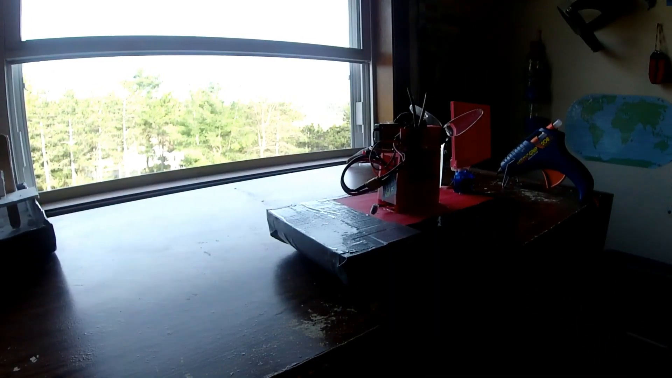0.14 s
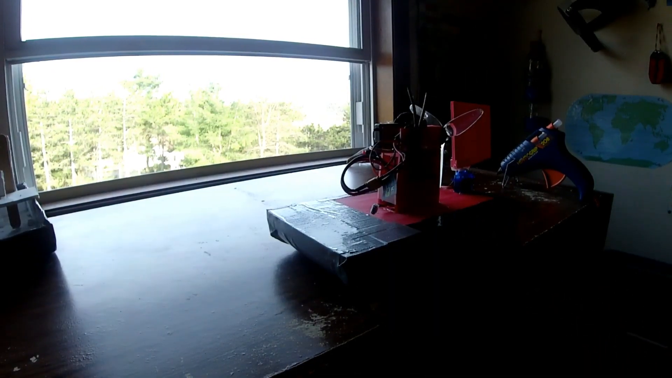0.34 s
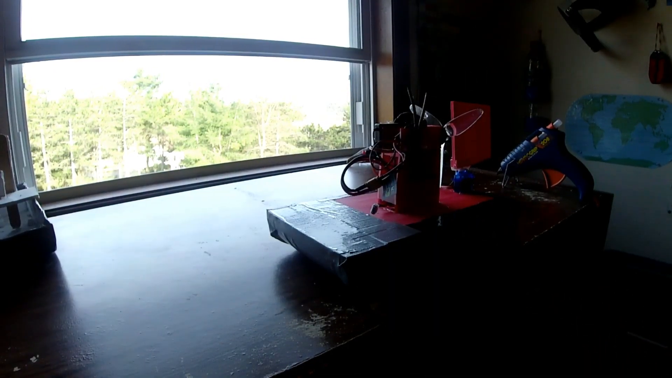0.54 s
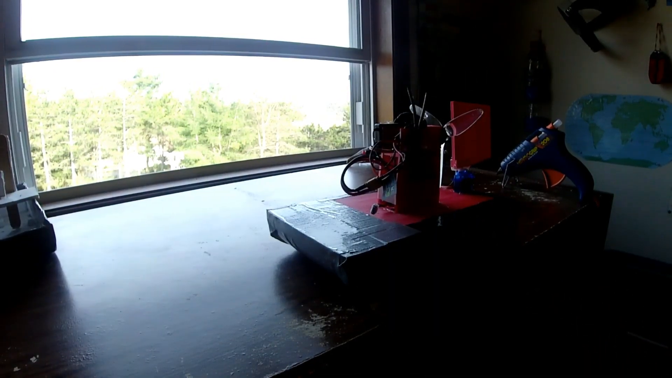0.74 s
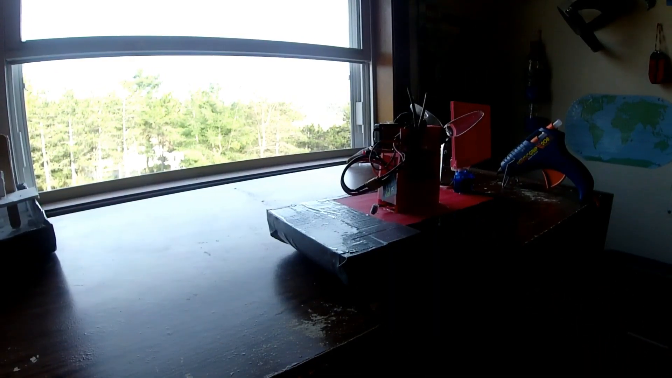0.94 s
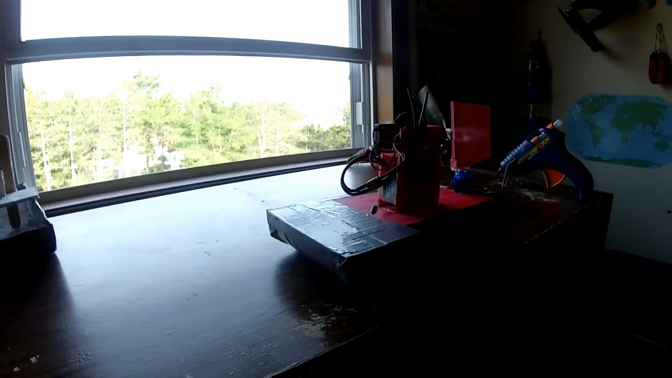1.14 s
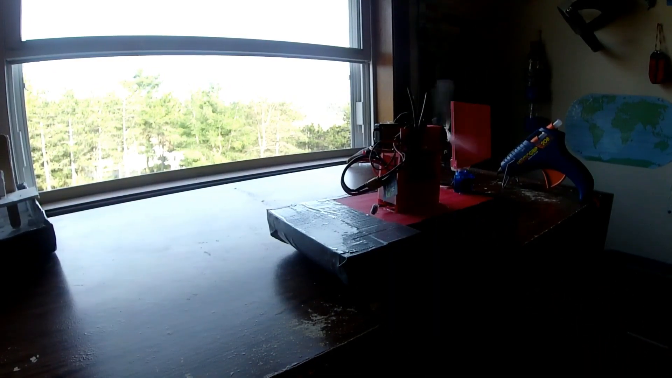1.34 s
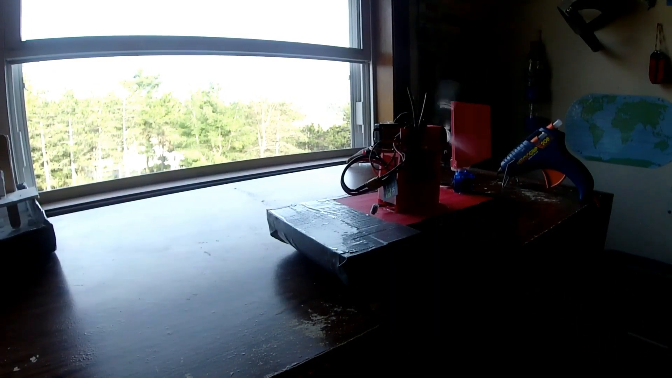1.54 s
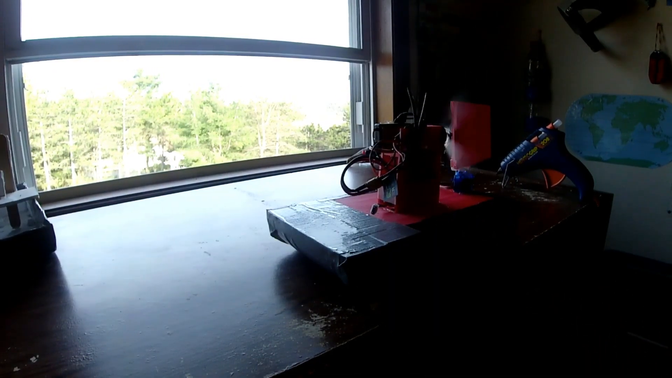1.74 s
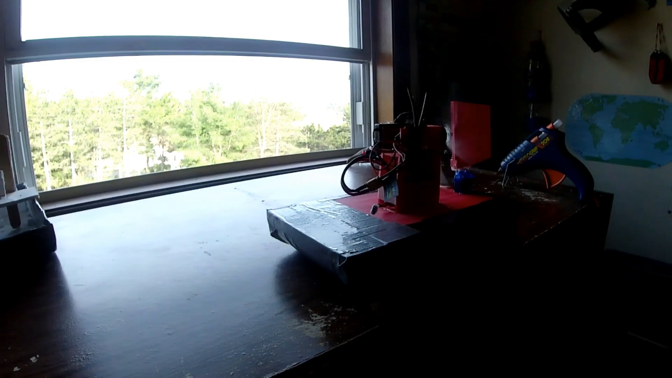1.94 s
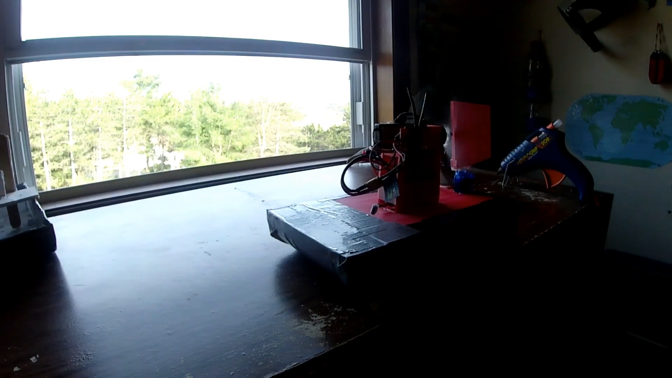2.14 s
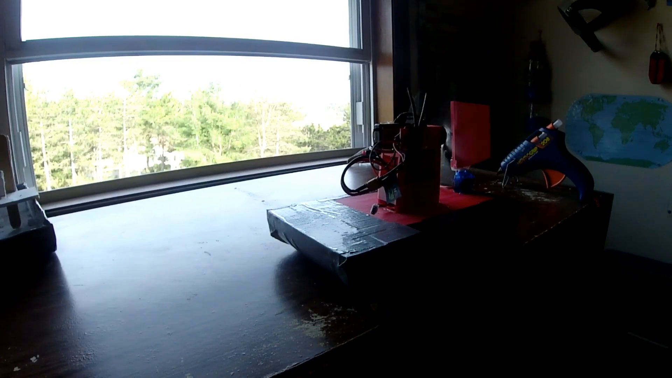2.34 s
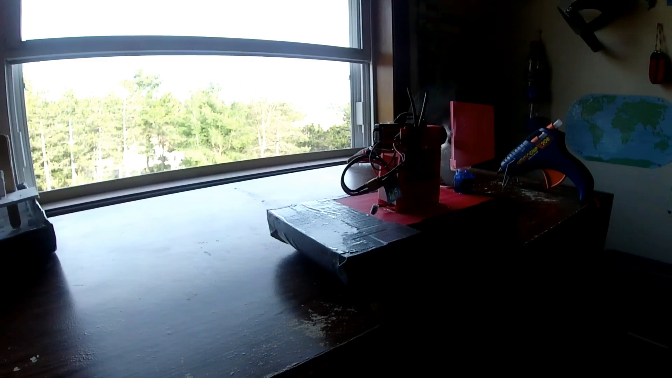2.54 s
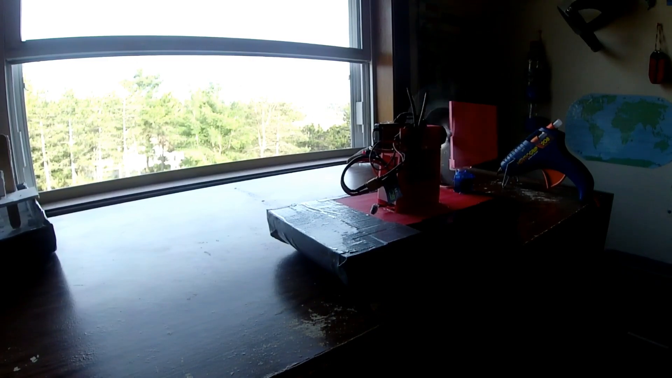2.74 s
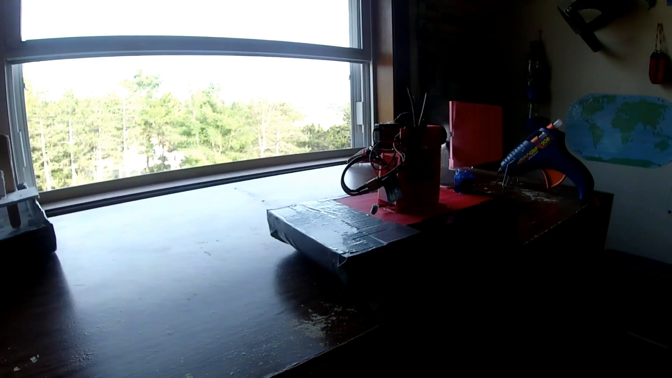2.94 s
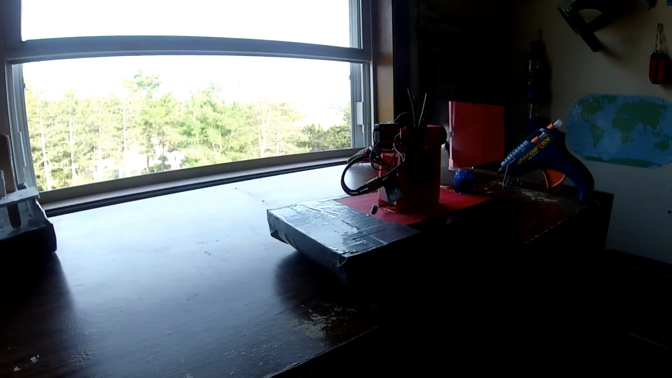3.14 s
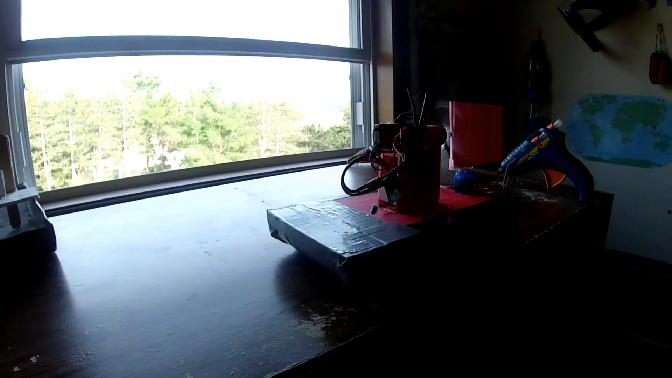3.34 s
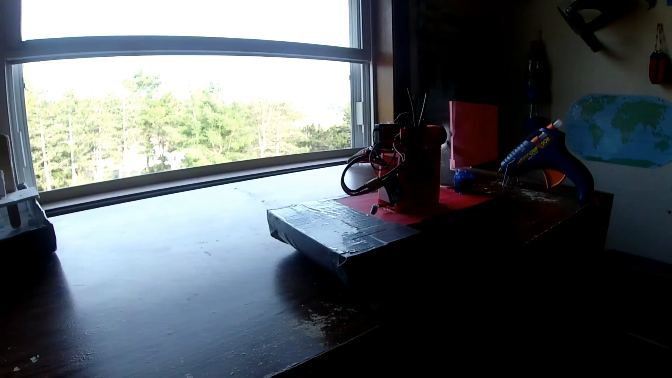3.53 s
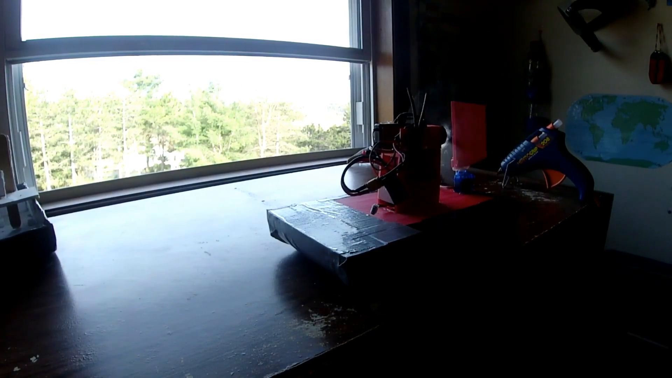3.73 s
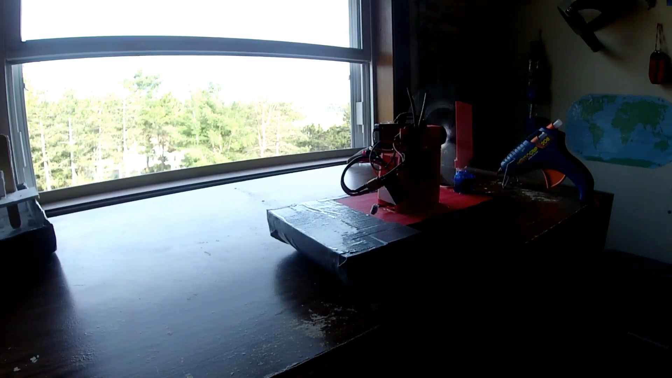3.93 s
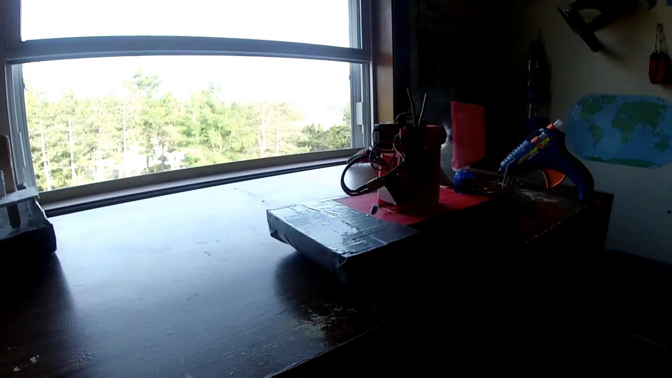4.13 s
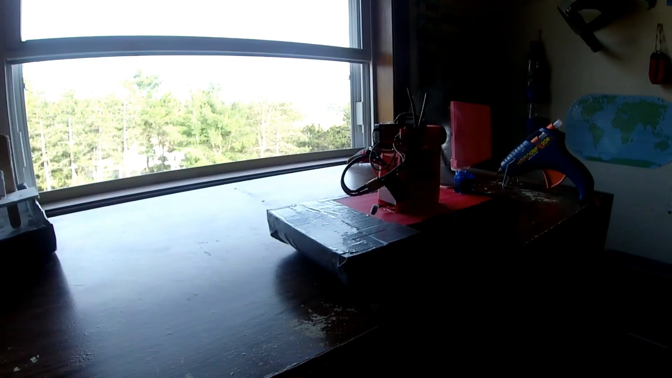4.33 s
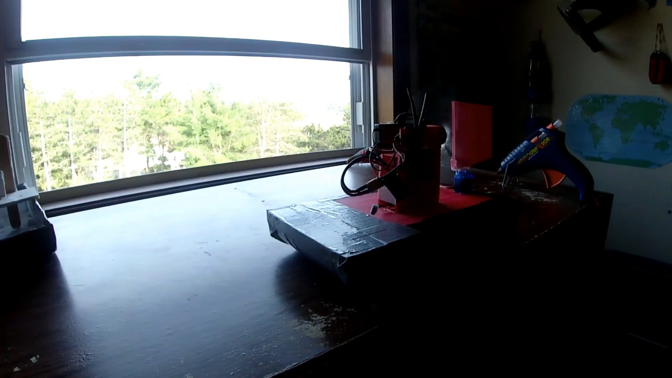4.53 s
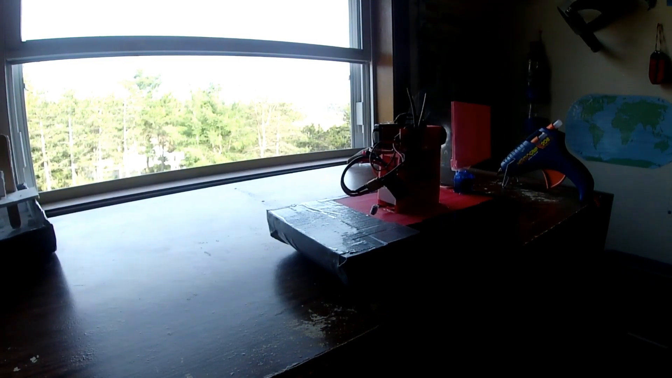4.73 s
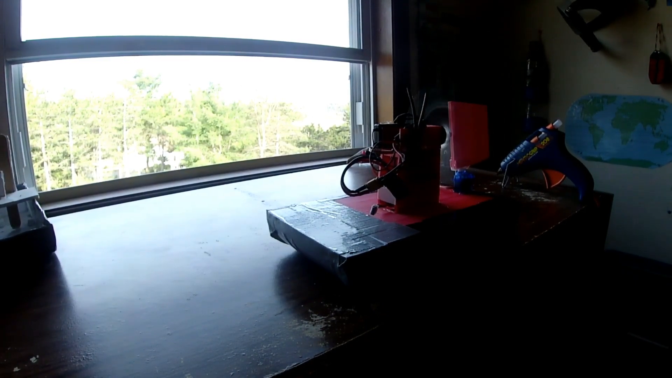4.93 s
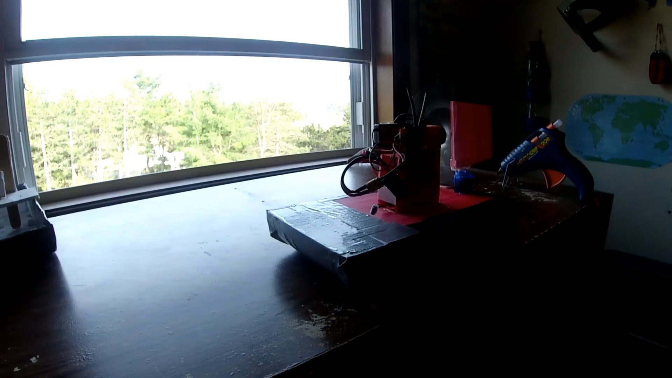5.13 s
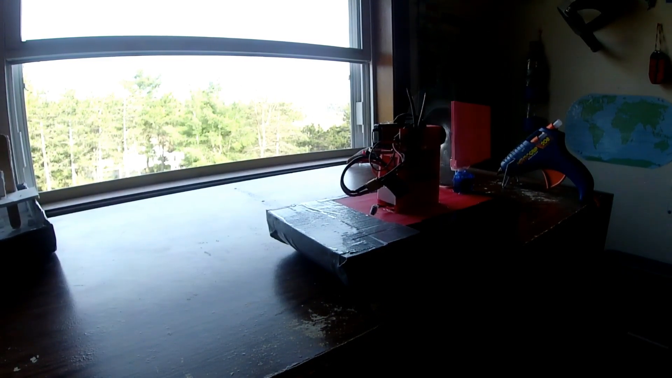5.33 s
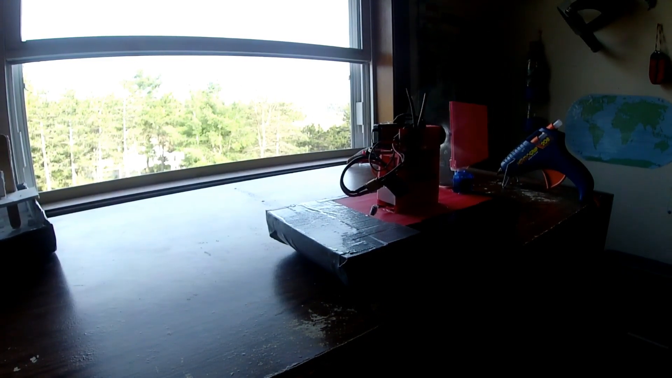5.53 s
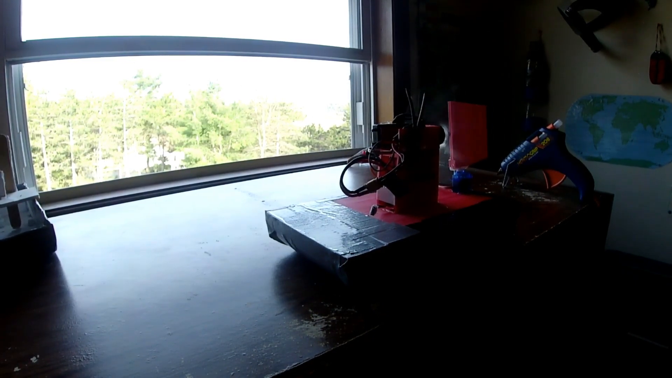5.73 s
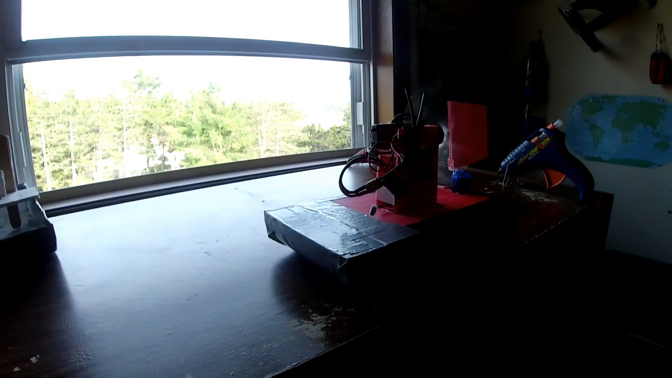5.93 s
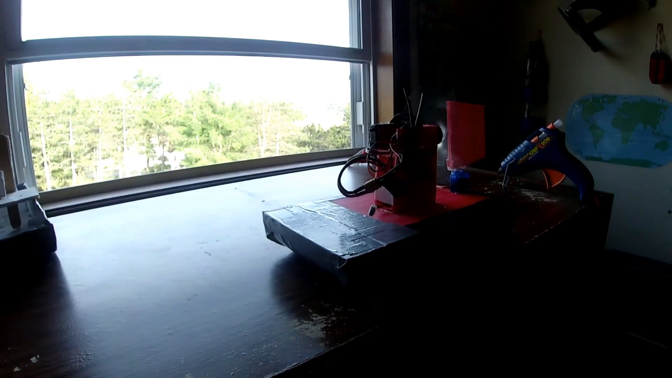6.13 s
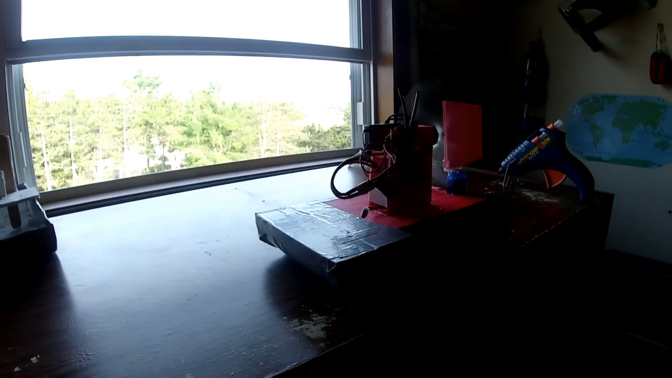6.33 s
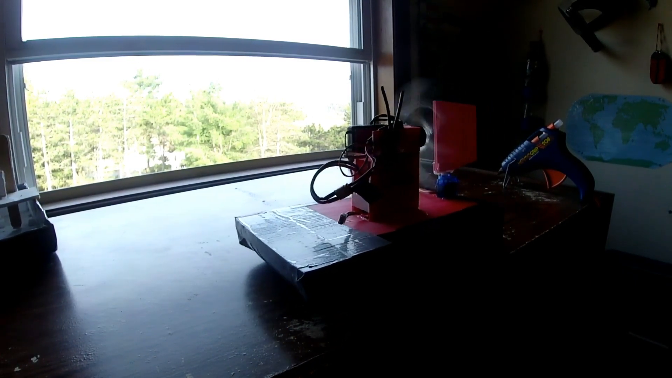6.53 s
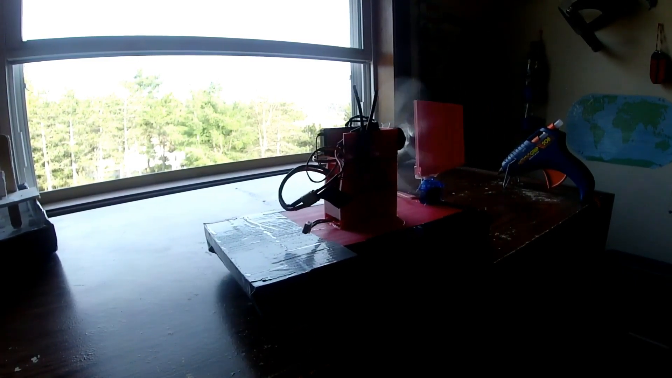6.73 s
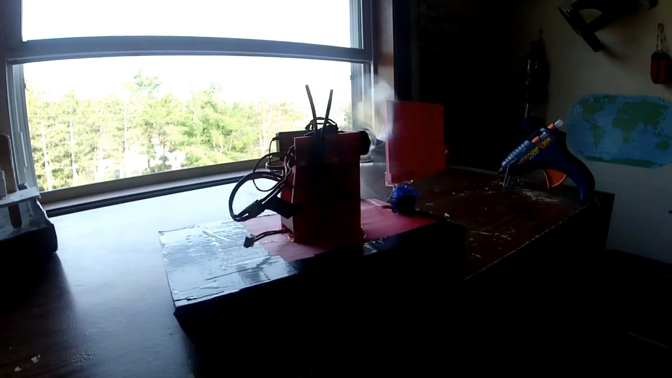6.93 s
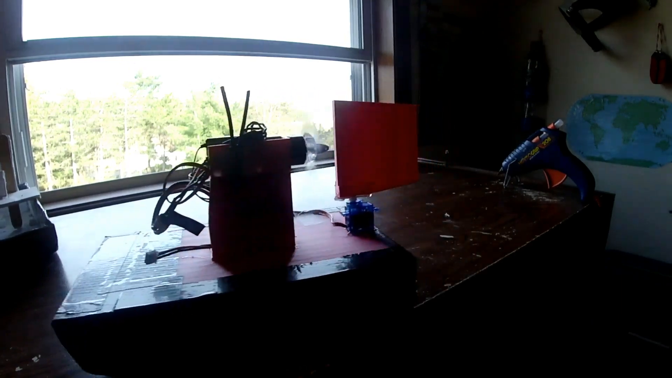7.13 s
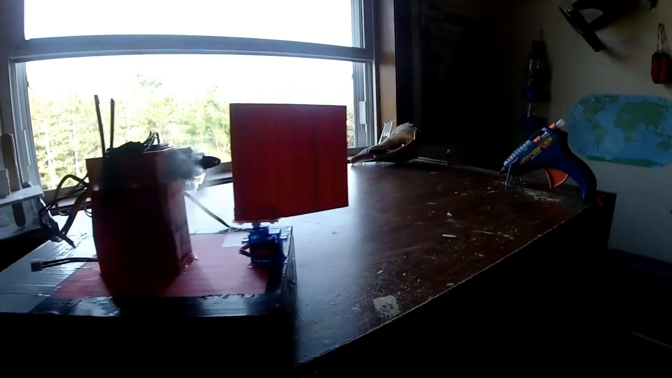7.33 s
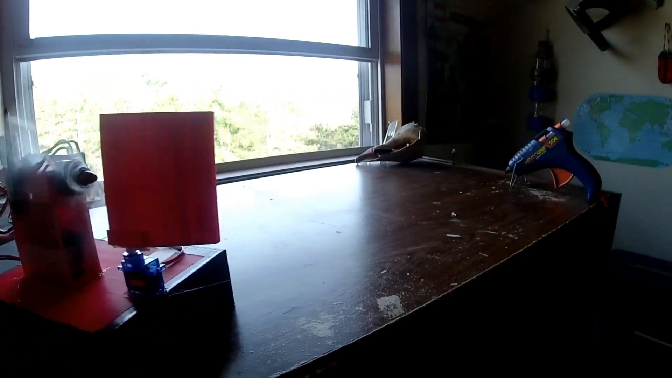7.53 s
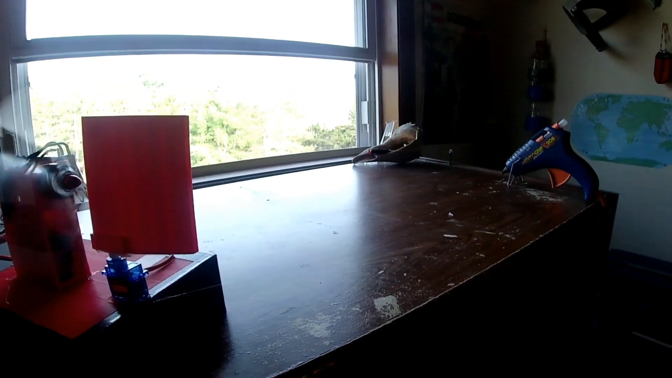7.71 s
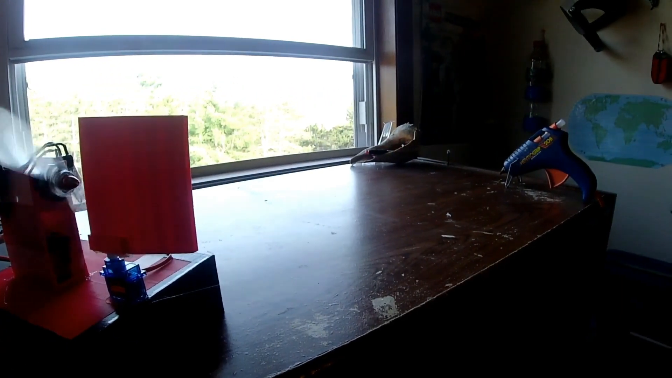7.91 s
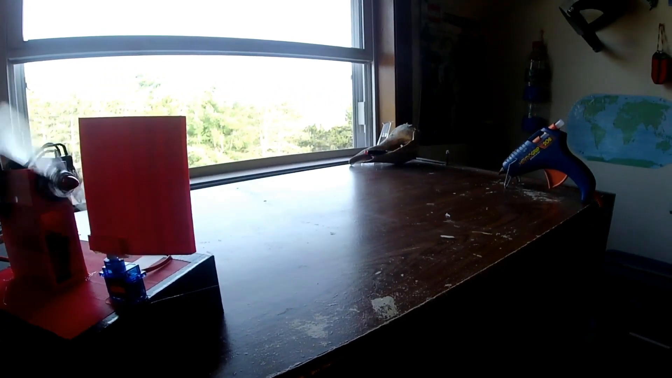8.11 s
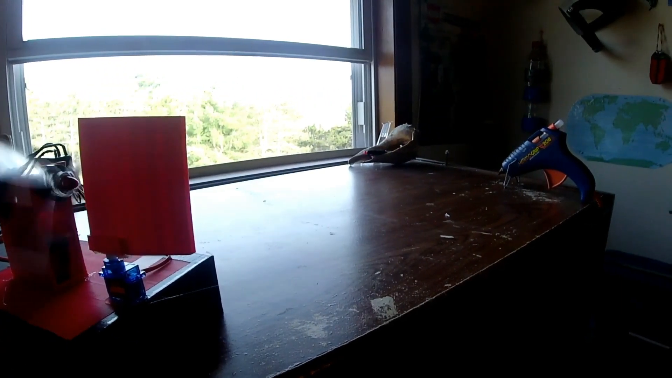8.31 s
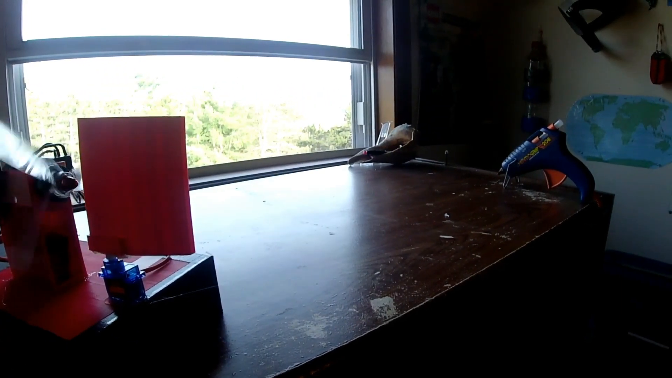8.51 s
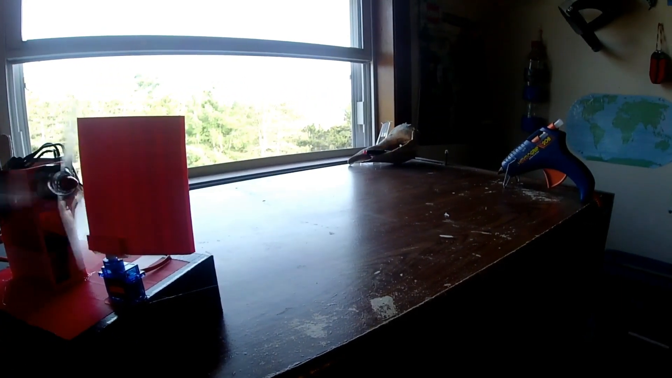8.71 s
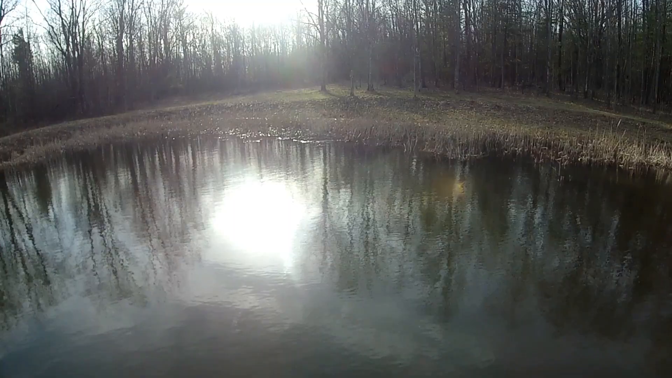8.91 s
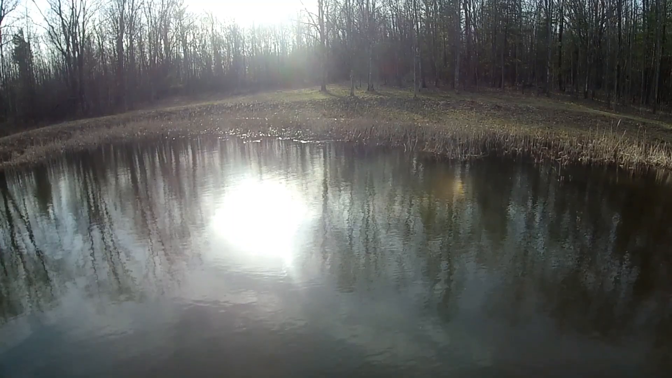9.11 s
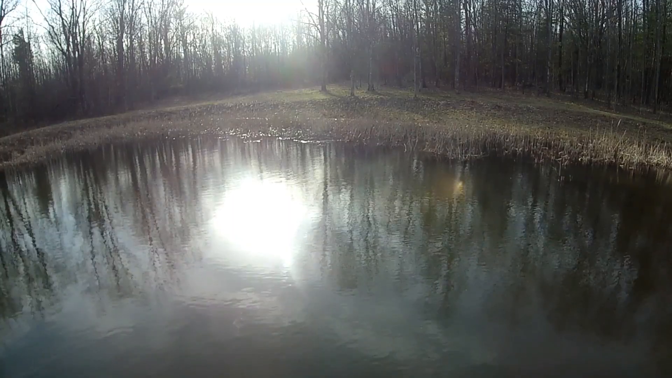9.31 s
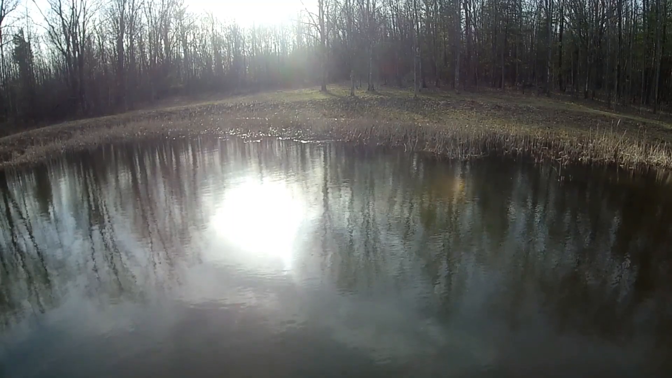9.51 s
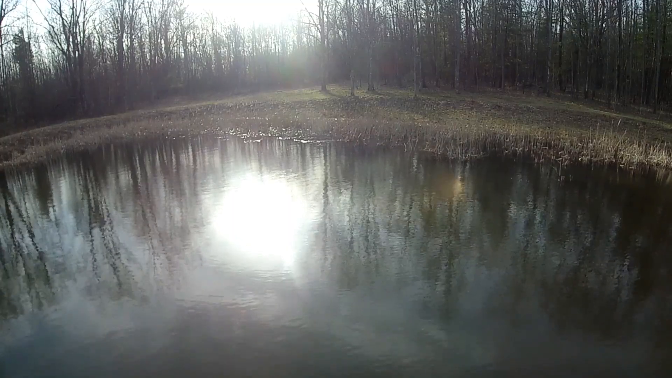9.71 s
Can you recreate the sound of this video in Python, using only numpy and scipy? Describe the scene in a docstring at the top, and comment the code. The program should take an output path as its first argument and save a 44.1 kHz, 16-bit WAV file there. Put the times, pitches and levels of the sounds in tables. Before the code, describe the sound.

On a desk indoors, a model boat's propeller climbs from faint whine to harsh windy buzz, winds down, clicks, and stops abruptly.

```python
"""On a desk indoors, a small brushless motor spins the propeller of a model airboat.
The blades hum and buzz (sines at multiples of the blade rate) and rush (noise that throbs with them),
louder as the throttle steps up; the speed controller whistles at its switching rate, with side tones
that spread as the shaft speeds up. Soft puffs and low servo rumbles come early and during the run.
The motor coasts down; clicks and short scrapes come near the end, then the sound is cut off."""
import sys
import numpy as np
from scipy import signal
from scipy.fft import rfft, irfft
from scipy.io import wavfile

SR = 44100
rng = np.random.default_rng(int(sys.argv[2]) if len(sys.argv) > 2 else 0)


def inscribe(sig):
    """Save sig as 16-bit PCM at rate SR to the path in sys.argv[1].

    A 1-D sig is mono; a 2-D sig holds one channel per row.
    Samples are clipped to [-1, 1] before scaling.
    """
    pcm = np.round(np.clip(np.atleast_2d(sig).T, -1, 1) * 32767)
    wavfile.write(sys.argv[1], SR, pcm.astype(np.int16))


N = 434826

TIME = np.arange(N) / SR
FREQS = np.fft.rfftfreq(N, 1 / SR)
EDGE_HZ = 15800  # top of the band
BLADES = 3
FULL_SPEED = 160  # turns per s near full throttle

# throttle steps: start_s, settled_speed [turns per s], lag_s
THROTTLE_STEPS = [(1.019, 32.9, 0.123), (1.52, 42.9, 0.045), (1.674, 88.0, 0.177), (1.93, 96.7, 0.128),
                  (2.38, 90.0, 0.165), (3.261, 103.4, 0.056), (4.251, 116.7, 0.08), (4.608, 123.4, 0.07),
                  (4.833, 131.6, 0.084), (5.122, 146.0, 0.157), (5.454, 152.9, 0.07), (5.805, 155.8, 0.035),
                  (6.043, 163.1, 0.05)]
CLOSE_S, CLOSING_S = 7.314, 0.197  # the throttle starts to close, and how long that takes
AIR_DRAG, FRICTION = 0.0138, 1.05  # slowing of the free shaft: share lost per turn, share lost per s
WANDER = 0.001  # rms share by which the shaft speed wanders


def shaft():
    """Turns per s: the shaft lags behind each throttle step, then coasts against air drag and friction."""
    driven, before = np.zeros(N), 0
    for start_s, settled, lag_s in THROTTLE_STEPS:
        u = np.maximum(TIME - start_s, 0) / lag_s
        driven += (settled - before) * (1 - (1 + u) * np.exp(-u))
        before = settled
    free_s = np.cumsum(np.clip((TIME - CLOSE_S) / CLOSING_S, 0, 1)) / SR
    left = np.exp(-FRICTION * free_s)
    coasting = driven * left / (1 + AIR_DRAG * driven / FRICTION * (1 - left))
    return (1 + WANDER * drift(3.037)) * coasting


# blade hum before its echo: blade_rate [passes per s], level_db
HUM_LEVEL = [(30, -100), (110, -77), (165, -59.5), (235, -51.5), (280, -49), (350, -42.5), (385, -38),
             (460, -34.5), (490, -30.5)]
# how the room carries the octave of the hum: pitch_hz, gain_db
OCTAVE_CARRY = [(550, -1.5), (640, 3.5), (690, 0.5), (750, -10.5), (810, 4.5), (880, 7), (930, -6),
                (975, 1.5)]
# balance of the blade overtones: pitch_hz, relative_db
BUZZ_BALANCE = [(300, 2), (540, 12.5), (700, 3.5), (850, 0.5), (930, 6), (980, 8.5), (1150, -0.5),
                (1550, 2.5), (1750, -1), (2000, 1), (3000, -1), (4000, -5), (5500, -11.5), (8000, -19)]
# the buzz, and more mildly the octave, flares and sinks: middle_s, half_length_s, gain_db
BUZZ_FLARES = [(3.58, .05, 3.5), (4.02, 0.035, -2), (4.3, 0.24, 1.5), (5.03, .04, 6), (5.32, 0.027, 3.5),
               (5.76, 0.075, 3.5), (6.13, 0.013, 5), (6.37, .03, -0.5), (6.6, 0.052, 3), (6.87, 0.24, -3.5),
               (7.27, 0.15, 6), (7.53, .07, 6), (8.3, 0.37, 11)]
ECHO_S, ECHO_SHARE = 0.0269, 0.19  # a wall echo makes the hum swell and sink as its pitch climbs
# dB at full speed before carry and flares, dB gained each time the speed doubles
BUZZ_DB, BUZZ_DB_PER_DOUBLING = -37, 15
OCTAVE_DB, OCTAVE_DB_PER_DOUBLING = -44, 23.5


def blades(speed, turns, jitter=0.015, octave_share=0.7):
    """Each blade slaps the air past the pylon; turbulence shifts the slaps and smears the high overtones."""
    passes = BLADES * turns + jitter * drift(62)
    rate = BLADES * speed

    hum = tone(passes, waver_db=1.5, waver_hz=4) * colour(HUM_LEVEL, rate)
    hum += ECHO_SHARE * np.interp(TIME - ECHO_S, TIME, hum)

    octave = tone(2 * passes, waver_db=2.0, waver_hz=18) * colour(OCTAVE_CARRY, 2 * rate)
    octave *= by_speed(speed, OCTAVE_DB, OCTAVE_DB_PER_DOUBLING)

    buzz, power = np.zeros(N), np.zeros(N)
    for k in range(3, 19):
        weight = colour(BUZZ_BALANCE, k * rate) / (1 + (k / 13) ** 6)
        buzz += weight * tone(k * passes, waver_db=3.0, waver_hz=9.5)
        power += weight ** 2
    flare = swells(BUZZ_FLARES, TIME)
    buzz *= by_speed(speed, BUZZ_DB, BUZZ_DB_PER_DOUBLING) * flare / np.sqrt(power)
    return hum + octave * flare ** octave_share + room(buzz, wet_db=-5)


# colour of the blade turbulence: pitch_hz, density_db [dB per Hz, relative]
RUSH_COLOUR = [(60, 5), (200, 1), (420, -22), (700, -10), (1200, -3.5), (2200, 3), (3000, 4.5), (4500, 5.5),
               (6500, 3), (8200, 3), (10000, -1.5), (13000, -5), (15800, -6)]
# level of the rush as the boat swings and slides: time_s, gain_db
RUSH_RIDE = [(4.7, 0.5), (5.15, 3), (5.35, 0.5), (6.3, 1), (7.2, 1.5), (7.45, 3), (8, -5)]
RUSH_DB, RUSH_DB_PER_DOUBLING = -43, 13.5  # dB at full speed before the ride, dB per doubling of speed


def air(speed, turns, throb=0.5, lopsided=0.13, gusty_db=1.27):
    """Turbulence off the blades swells with every pass and every turn."""
    rush = noise(RUSH_COLOUR, (4400, 6100))
    pass_throb = throb * np.cos(2 * np.pi * BLADES * turns)
    turn_throb = lopsided * np.cos(2 * np.pi * turns)
    ride_db = np.interp(TIME, *np.transpose(RUSH_RIDE)) + gusty_db * drift(25)
    rush *= evened(1 + pass_throb + turn_throb) * gain_of(ride_db)
    rush *= by_speed(speed, RUSH_DB, RUSH_DB_PER_DOUBLING)
    return room(rush, wet_db=-6)


SWITCH_HZ, OVERTONE_HZ, HOUSING_HZ = 7529, 15058, 11158
# whistle and the tones that follow it: rest_pitch_hz, shift [shaft rates, rounded in use], relative_db
WHISTLE_TONES = [(SWITCH_HZ, 0, 0), (OVERTONE_HZ, 0, -13), (HOUSING_HZ, 0, -20), (SWITCH_HZ, -1.5, -23),
                 (SWITCH_HZ, -13.5, -18), (SWITCH_HZ, -44.5, -20), (HOUSING_HZ, 14, -16.5),
                 (HOUSING_HZ, 8, -23)]
# switching whistle before its flutter: speed [turns per s], level_db
WHISTLE_LEVEL = [(0, -58.5), (40, -47.5), (75, -41), (105, -42.5), (163, -44.5)]
# upper, then lower side tone before the lifts below: rest_db, full_speed_db
SIDE_TONE_LEVELS = [(-44.5, -53), (-47.5, -57)]
# speeds at which the shaft runs critical and the side tones swell: # speed [turns per s], half_width [turns per
# s], upper_lift_db, lower_lift_db
CRITICAL_SPEEDS = [(19, 3.8, 5.5, -7), (31.38, 2.9, 15, 24), (59.4, 10.4, 11, 15.5), (105, 9, 4, 6),
                   (127, 15, 1, 4)]
# sizzle of the switched windings: pitch_hz, density_db [dB per Hz, relative]
SIZZLE_COLOUR = [(200, -47), (6500, -31.5), (7100, -23.5), (7350, -13.5), (7530, -5.5), (7950, -12),
                 (8150, -8), (8700, -29), (10600, -43.5), (11150, -17.5), (11700, -33), (14300, -46),
                 (15050, -3), (15800, -29)]
# level of the sizzle before its waver: time_s, level_db
SIZZLE_RIDE = [(.96, -86), (.98, -43), (1.03, -50), (1.2, -45), (1.4, -45.5), (1.9, -42.5), (2.3, -48),
               (4.6, -50), (5.6, -47), (7.4, -58), (7.6, -75.5)]
# resonances of the motor mount: pitch_hz, width_hz, relative_db
MOUNT_MODES = [(551, 24.9, -2), (1570, 53.5, -10), (2107, 40, -0.5), (2320, 21, -8), (2934, 160, -6.5),
               (3530, 110, -7.5), (5750, 120, -13.5)]
SIDE_ORDERS = (14, 11)  # upper and lower side tone: rise in shaft rates
POWER_ON_S, POWER_OFF_S, POWER_FADE_S = 0.98, 7.58, 0.22  # the controller drives the windings
FLUTTER_DB = 2.5  # the whistle flutters in the blade wash: rms depth at full speed


def controller(speed, turns, half_db=-20, mount_db=-16):
    """Switched current makes the windings whistle and rings the mount; commutation splits off side tones."""
    clock = 0.017 * drift(40)
    effort = speed / FULL_SPEED
    rise = np.clip((TIME - POWER_ON_S) / 0.005, 0, 1)
    powered = rise * np.clip((POWER_OFF_S - TIME) / POWER_FADE_S, 0, 1)

    whistle = np.zeros(N)
    for hz, shift, db in WHISTLE_TONES:
        phase = hz * TIME + round(shift) * turns + clock
        whistle += gain_of(db) * tone(phase, waver_db=1.5, waver_hz=20)
    whistle *= powered * gain_of(np.interp(speed, *np.transpose(WHISTLE_LEVEL)))

    sides, ringing = np.zeros(N), []
    for i, (rest_db, full_db) in enumerate(SIDE_TONE_LEVELS):
        gain = powered * gain_of(rest_db + (full_db - rest_db) * effort)
        gain *= swells(CRITICAL_SPEEDS, speed, column=i + 2)
        phase = SWITCH_HZ * TIME + SIDE_ORDERS[i] * turns + clock
        sides += gain * tone(phase, waver_db=2.0, waver_hz=25)
        ringing.append(gain)

    # a loud upper side tone brings a tone about an octave lower
    upper = ringing[0]
    half_gain = gain_of(half_db) * upper * upper / upper.max()
    sides += half_gain * tone(SWITCH_HZ / 2 * TIME + 9 * turns, waver_db=0.5, waver_hz=29.9)

    sizzle = noise(SIZZLE_COLOUR, (20, EDGE_HZ)) * gain_of(2 * drift(30))
    modes = np.zeros(len(FREQS))
    for hz, width_hz, db in MOUNT_MODES:
        modes += gain_of(db) ** 2 / (1 + (2 * (FREQS - hz) / width_hz) ** 2) ** 2
    mount = evened(irfft(rfft(rng.standard_normal(N)) * np.sqrt(modes), N))
    current = (sizzle + gain_of(mount_db) * mount) * level(SIZZLE_RIDE)

    flutter = gain_of(FLUTTER_DB * effort ** 2 * drift(8))
    return (whistle + room(sides, wet_db=-3.5)) * flutter + current


# how readily the hull radiates the rotor's unbalance: pitch_hz, gain_db
HULL_RESPONSE = [(50, 6), (90, 7), (115, 12), (140, -2), (152, -15.5), (164, -4), (185, 1), (228, 10.5),
                 (260, -9), (326, 1), (420, -4.5), (650, -5.5), (1000, -9.5), (2300, -15.5)]
# the hull rocks every second turn: time_s, level_db
ROCKING_LEVEL = [(5.5, -60), (6.3, -59), (6.8, -54), (7.3, -46), (7.7, -66)]
# magnetic ripple of the motor: time_s, level_db at 42 pulls a turn, level_db at 84
COGGING_LEVELS = [(1.7, -69, -87), (1.8, -57, -76), (2.3, -58.5, -78), (2.6, -61, -76), (3.2, -62, -76),
                  (3.5, -64, -81.5), (7.5, -67, -84.5), (7.9, -63, -79), (8.1, -72, -67), (8.6, -72, -85)]
# dry whir of the bearings in the motor mount: pitch_hz, density_db [dB per Hz, relative]
WHIR_COLOUR = [(110, -7), (400, 2.5), (560, 3.5), (800, 3), (1150, 3.5), (1750, 1.5), (2120, 5), (2420, 3),
               (2950, 2.5), (3550, -2), (4700, -9.5), (5800, -12.5), (7000, -13.5), (15000, -29)]
# level of the whir before it throbs with the turns: time_s, level_db
WHIR_RIDE = [(.96, -69), (1, -69), (1.5, -60), (2.2, -55), (7.5, -45), (7.9, -54), (8.3, -63.5),
             (8.7, -64.5), (8.93, -60.5)]
SHAKE_DB, SHAKE_DB_PER_DOUBLING = -50, 20.5  # dB at full speed before the hull, dB per doubling of speed


def rotor(speed, turns, flutter=0.215):
    """Unbalance shakes the hull at shaft orders; the magnets add thin notes, the bearings a whir."""
    shake = np.zeros(N)
    for k in range(1, 16):
        if k % BLADES:  # multiples of the blade rate belong to the blades
            shake += colour(HULL_RESPONSE, k * speed) * tone(k * turns, waver_db=3.5, waver_hz=1.5)
    shake *= by_speed(speed, SHAKE_DB, SHAKE_DB_PER_DOUBLING)

    rock = tone(turns / 2, waver_db=3, waver_hz=16.0) * level(ROCKING_LEVEL)

    pulls = 42 * turns + flutter * drift(35)  # the shaft turns unevenly, which roughens these notes
    cogging = np.zeros(N)
    for k in (1, 2):
        cogging += tone(k * pulls, waver_db=5.5, waver_hz=39.45) * level(COGGING_LEVELS, column=k)

    whir = noise(WHIR_COLOUR, (20, EDGE_HZ)) * level(WHIR_RIDE)
    whir *= 1 + 0.18 * np.cos(2 * np.pi * turns)
    return shake + rock + cogging + whir


# sharp contacts: start_s, peak_db, decay_s, lowest_hz, highest_hz
CONTACTS = [(8.062, -42.5, 0.0025, 3020, 8000), (8.172, -42, .003, 1990, 6050),
            (8.6849, -20.5, 0.0015, 60.4, 3650), (8.695, -32, 0.0025, 2000, 9000),
            (8.725, -26, 0.0029, 3470, 9000), (8.786, -45, .002, 4000, 7000),
            (8.843, -38, .001, 2450, 7000), (8.879, -38, 0.0012, 1500, 6750)]
# puffs, servo rumbles and rubs: middle_s, level_db, length_s, centre_hz, width_octaves
SOFT_SOUNDS = [(0.09, -60.5, 0.13, 433, 0.2), (1.008, -59, 0.15, 334, 0.16), (1.162, -57, 0.14, 324, 0.2),
               (1.407, -61.5, 0.43, 328, 0.15), (3.33, -41, 0.29, 31.96, 0.34),
               (3.722, -44, 0.88, 31.14, 0.58), (3.818, -49.5, 0.32, 460, 0.59),
               (8.293, -89, .14, 6000, 1.42), (8.477, -66.5, 0.13, 5020, 1),
               (8.736, -41.5, 0.091, 4880, 1.3), (8.824, -42, 0.038, 2830, 1.5)]


def incidental(grain_db=3, crackle=0.47):
    """Clicks are short pushes with a dying crackle; the rest are swells of grainy noise."""
    out, t = np.zeros(N), TIME[:2048]
    for start_s, db, decay_s, low_hz, high_hz in CONTACTS:
        push = crackle * rng.standard_normal(len(t)) - np.exp(-t * high_hz)
        push *= np.exp(-t / decay_s)
        band = signal.butter(2, [low_hz, high_hz], "bandpass", fs=SR, output="sos")
        click = signal.sosfilt(band, push)
        add(out, start_s, gain_of(db) * click / abs(click).max())

    count = 32768
    t = (np.arange(count) - count / 2) / SR
    f = np.fft.rfftfreq(count, 1 / SR) + 1
    for middle_s, db, length_s, hz, octaves in SOFT_SOUNDS:
        grains = rng.standard_normal(count) * gain_of(grain_db * rng.standard_normal(count))
        band = 1 / (1 + (np.log2(f / hz) / octaves) ** 4)
        dulling = 1 / (1 + (f / 11500) ** 6)
        grainy = evened(irfft(rfft(grains) * band * dulling))
        swell = np.cos(np.pi * t / length_s) ** 2
        audible = abs(t) < length_s / 2
        add(out, max(middle_s - length_s / 2, 0), (gain_of(db) * grainy * swell)[audible])
    return out


# colour of the room hiss: pitch_hz, density_db [dB per Hz, relative]
HISS_COLOUR = [(35, -30.5), (60, 1.5), (91, -11.5), (115, -12), (359, -18), (385, -20.5), (413, -16),
               (443, -22), (1420, -29.5), (15500, -39.5)]
# colour of the draught rumble: pitch_hz, density_db [dB per Hz, relative]
DRAUGHT_COLOUR = [(5, -4.5), (12, 5), (22, -10), (35, -16.5), (55, -37.5), (100, -41), (300, -80.5)]
# steady draught with one gust during the coast-down: time_s, level_db [from 20 to 60 Hz]
DRAUGHT_RIDE = [(0, -58.5), (7.98, -57), (8.11, -34), (8.35, -48.5), (8.9, -56.5)]
HISS_DB = -64.5  # from 100 to 15500 Hz


def background():
    """Room hiss, and slow draughts on the microphone, both as coloured noise."""
    hiss = noise(HISS_COLOUR, (100, 15500))
    draught = noise(DRAUGHT_COLOUR, (20, 60))
    return gain_of(HISS_DB) * hiss + draught * gain_of(np.interp(TIME, *np.transpose(DRAUGHT_RIDE)))


def room(x, wet_db, t60=0.3):
    """Sparse echoes from the desk, window and walls, at unchanged power."""
    t = TIME[:SR // 2]
    sparse = (rng.random(len(t)) < 0.06) * (t > 0.002)
    taps = rng.standard_normal(len(t)) * sparse * np.exp(-np.log(1000) * t / t60)
    wet = signal.oaconvolve(x, taps / np.linalg.norm(taps))[:N]
    return (x + gain_of(wet_db) * wet) / np.sqrt(1 + gain_of(wet_db) ** 2)


def gain_of(db):
    """Decibels to gain."""
    return 10 ** (np.asarray(db) / 20)


def evened(x):
    """Scales to rms 1."""
    return x / np.sqrt(np.mean(x ** 2) + 1e-20)


def level(rows, column=1):
    """Gain over time from a dB curve, all but silent outside it."""
    rows = np.array(rows)
    return gain_of(np.interp(TIME, rows[:, 0], rows[:, column], left=-140, right=-140))


def colour(points, hz):
    """Gain at the given frequencies, from a dB curve on a log frequency axis."""
    f, db = np.transpose(points)
    return gain_of(np.interp(np.log(hz + 1), np.log(f + 1), db))


def by_speed(speed, db, db_per_doubling):
    """Gain that grows as a power of the shaft speed."""
    return gain_of(db + db_per_doubling * np.log2(speed / FULL_SPEED + 1e-6))


def swells(rows, along, column=2):
    """Gain from rounded bumps in dB, each with a middle and a half width."""
    return gain_of(sum(row[column] * np.exp(-abs((along - row[0]) / row[1]) ** 3) for row in rows))


def noise(points, band):
    """Coloured noise with rms 1 inside the band."""
    z = rfft(rng.standard_normal(N)) * colour(points, FREQS)
    inside = (FREQS > band[0]) * (FREQS < band[1])
    return irfft(z, N) / np.std(irfft(z * inside, N))


def drift(rate_hz):
    """Slow chance of rms about 1, up to about the given rate."""
    count = 8192
    f = np.fft.rfftfreq(count, TIME[-1] / count)
    slow = irfft(rfft(rng.standard_normal(count)) / (1 + (f / rate_hz) ** 2))
    return np.interp(TIME, np.linspace(0, TIME[-1], count), evened(slow))


def tone(turns, waver_db, waver_hz):
    """A sine of rms about 1 whose level wavers, one cycle per turn."""
    sine = np.sin(2 * np.pi * (turns + rng.random()))
    return np.sqrt(2) * sine * gain_of(waver_db * drift(waver_hz))


def add(mix, s, sound):
    """Mixes a sound in at a time."""
    part = mix[round(s * SR):][:len(sound)]
    part += sound[:len(part)]


# how far the left channel trails the right: pitch_hz, lag [microseconds]
CHANNEL_LAG = [(150, 2.4), (700, 3.7), (1500, 5), (3000, 12), (7500, 23), (15000, 22.6)]
# echoes of the rush that differ between the channels: pitch_hz, gain_db
ECHO_WIDTH = [(200, -61), (1000, -43), (2500, -28.5), (6000, -8.5), (15000, -20)]


def scene():
    """All sources reach the left channel a moment after the right; echoes of the rush widen them a little."""
    speed = shaft()
    turns = np.cumsum(speed) / SR
    wind = air(speed, turns)
    mid = blades(speed, turns) + wind + controller(speed, turns) + rotor(speed, turns)
    mid += incidental() + background()

    # half the lag as a phase: the side signal delays the left and advances the right
    half_lag = np.pi * FREQS * np.interp(FREQS, *np.transpose(CHANNEL_LAG)) / 1e6
    direct = rfft(mid) * -1j * np.tan(np.minimum(half_lag, 1.2))
    diffuse = rfft(room(wind, wet_db=21)) * colour(ECHO_WIDTH, FREQS)
    side = irfft(direct + diffuse, N)
    return np.array([mid + side, mid - side])


CUT_S = 8.93


def record(dry):
    """The sound is cut off with a very short fade; then a lowpass limits the band."""
    edge = signal.firwin(511, EDGE_HZ, window=("kaiser", 9), fs=SR)
    fade = np.clip((CUT_S - TIME) / 0.003, 0, 1)
    return signal.oaconvolve(dry * fade, edge[None], "same", axes=1)


dry = scene()
out = record(dry)
inscribe(out)
```